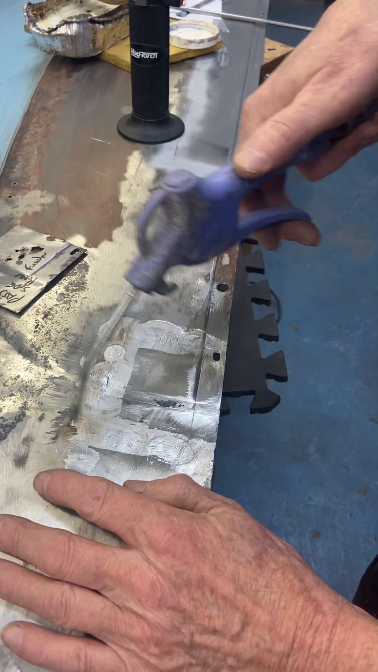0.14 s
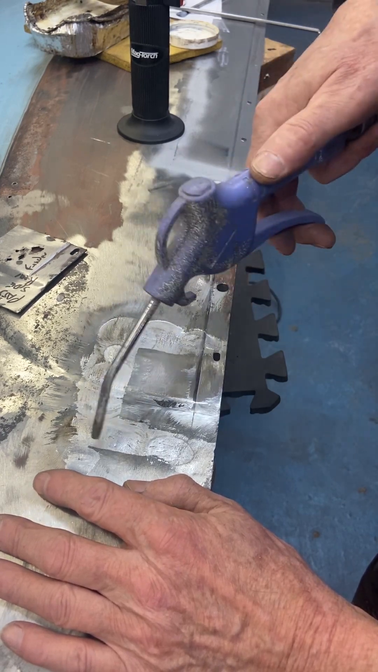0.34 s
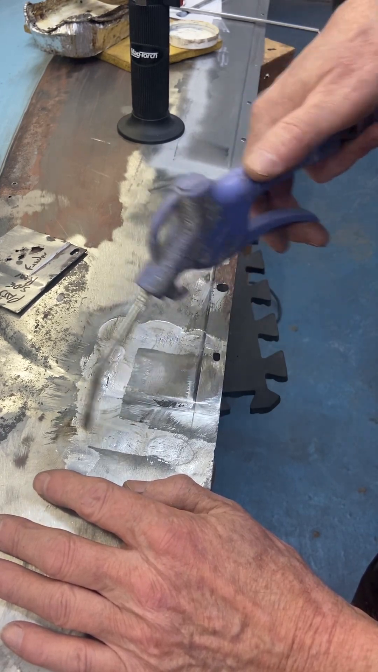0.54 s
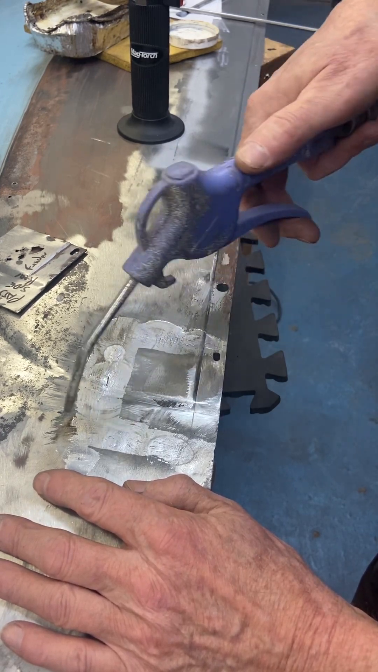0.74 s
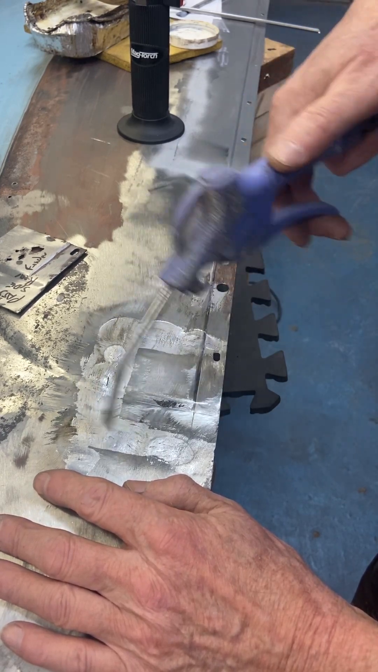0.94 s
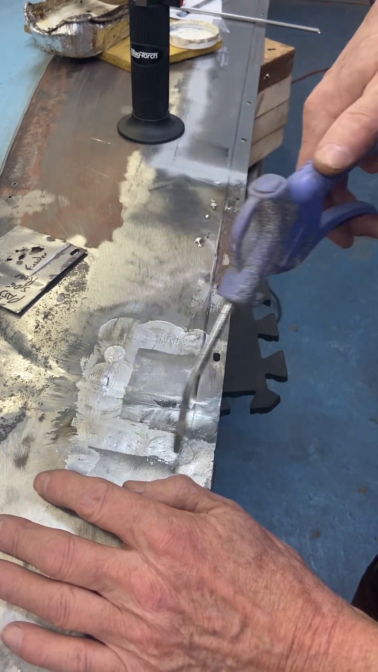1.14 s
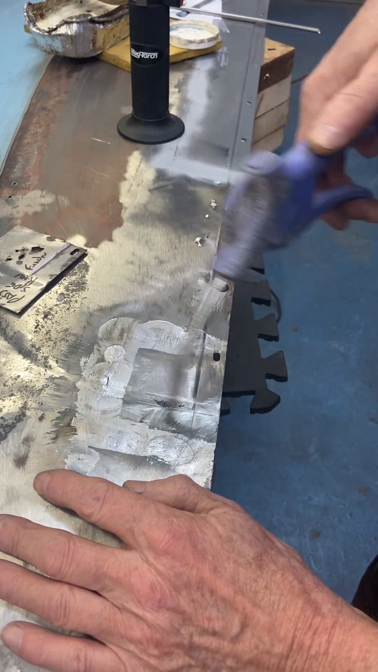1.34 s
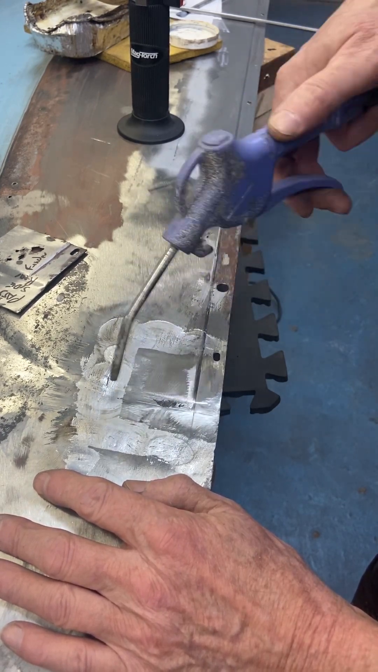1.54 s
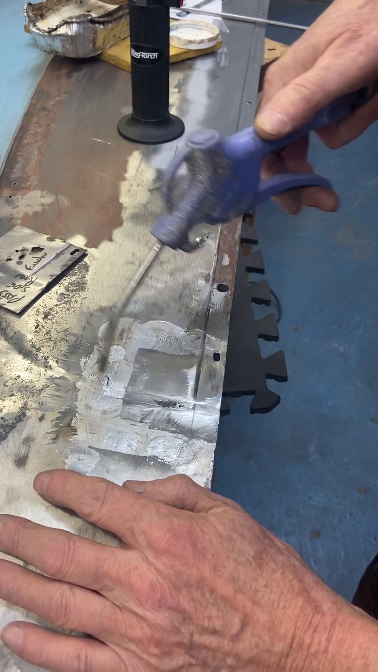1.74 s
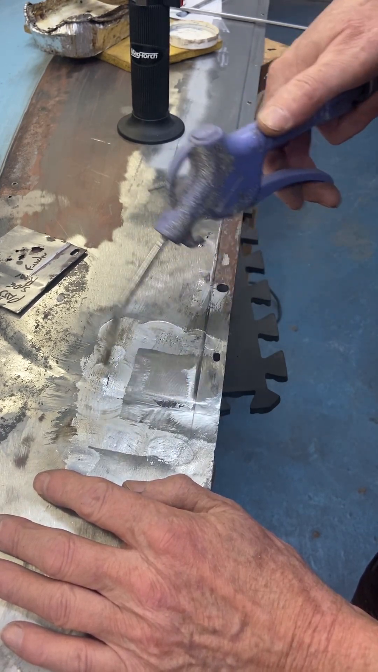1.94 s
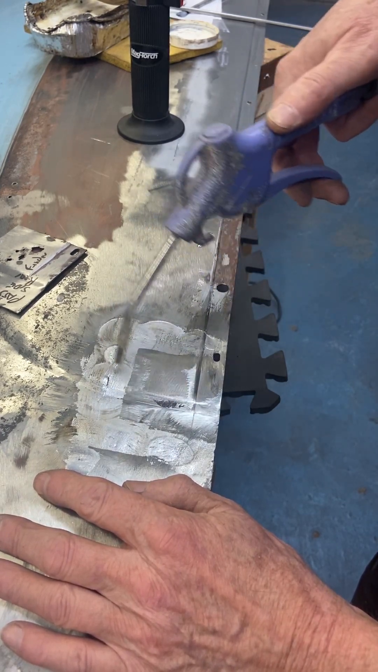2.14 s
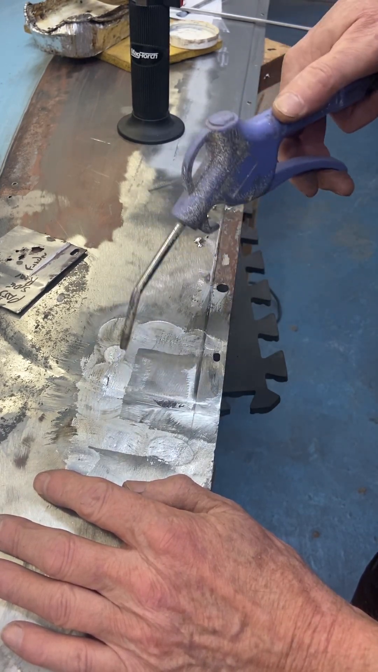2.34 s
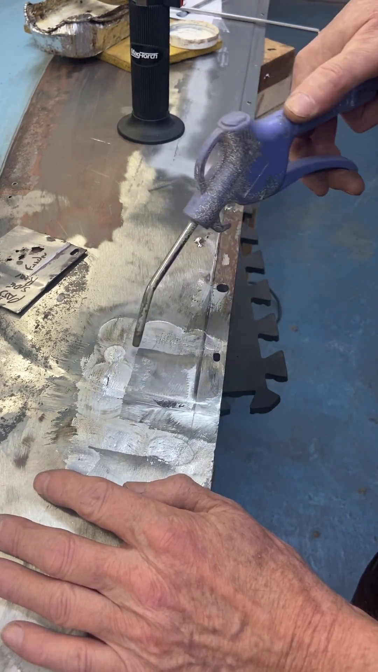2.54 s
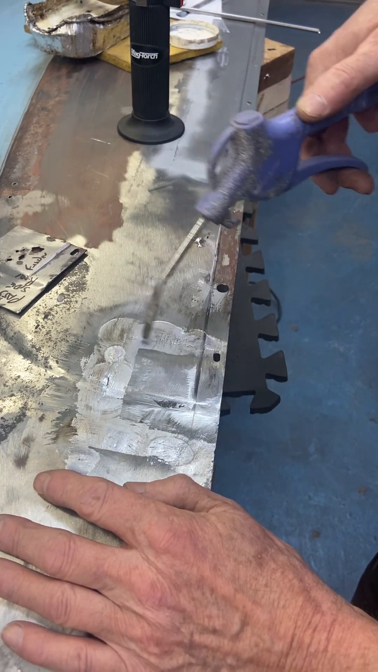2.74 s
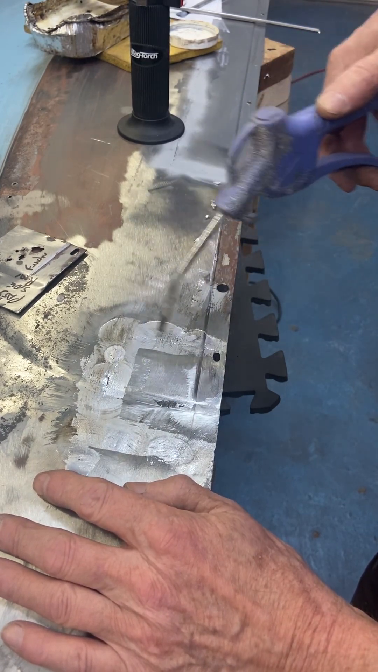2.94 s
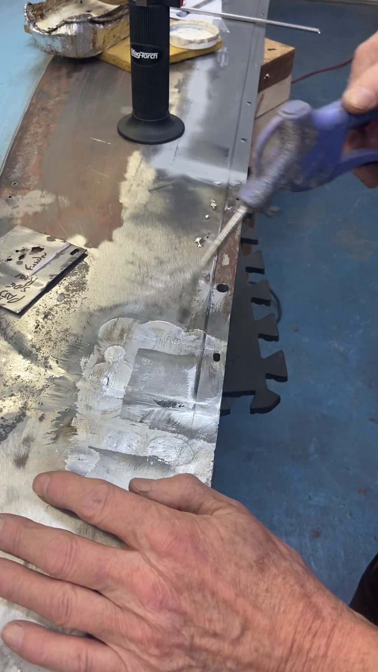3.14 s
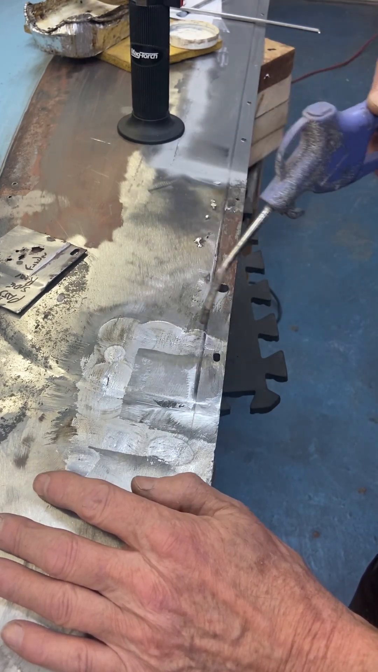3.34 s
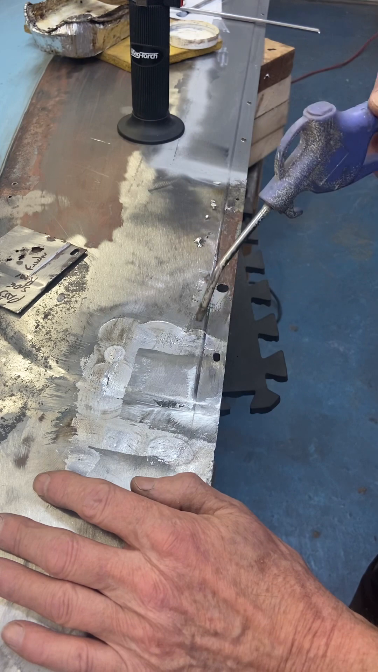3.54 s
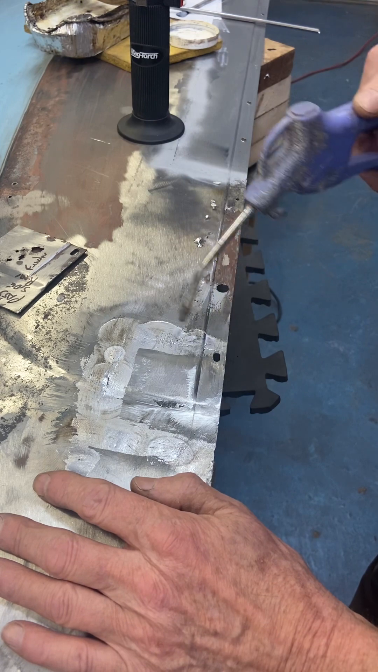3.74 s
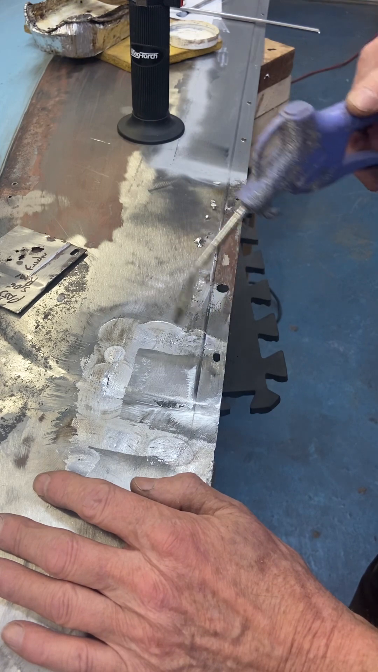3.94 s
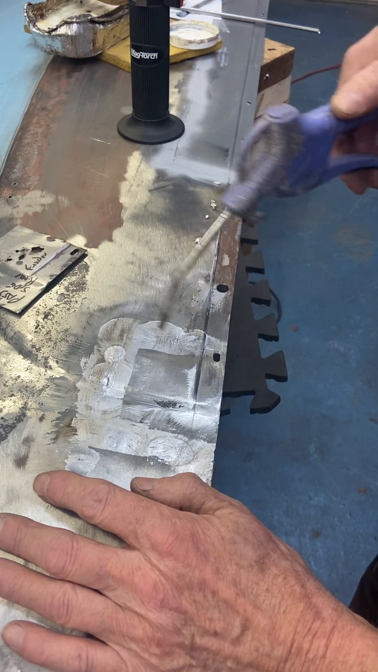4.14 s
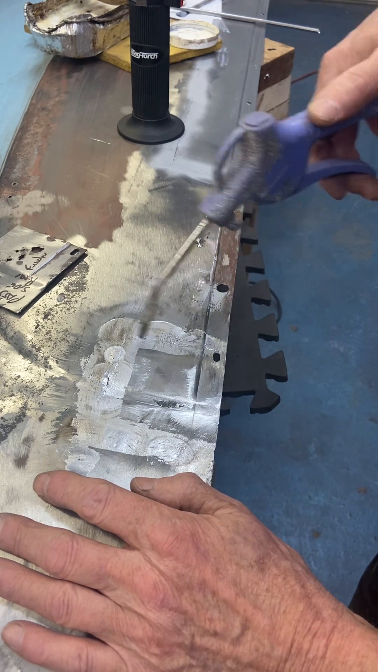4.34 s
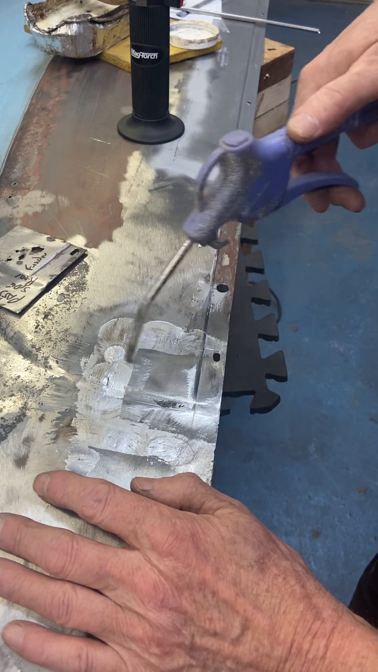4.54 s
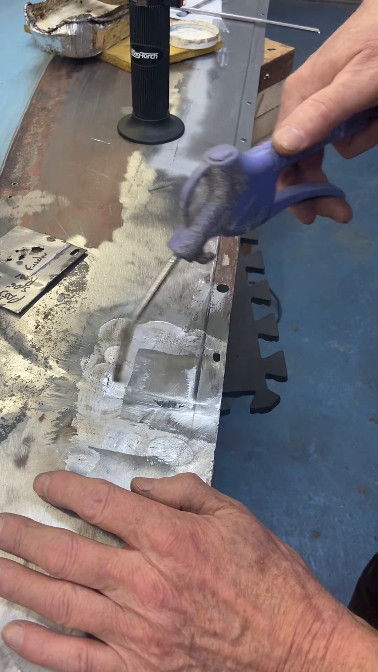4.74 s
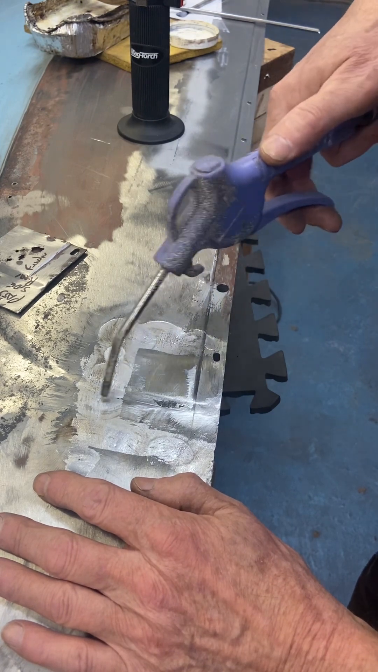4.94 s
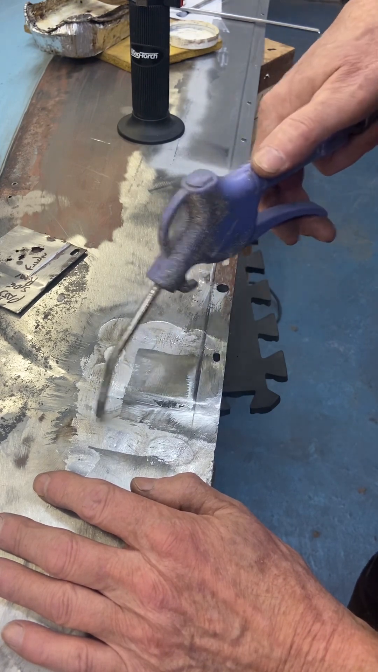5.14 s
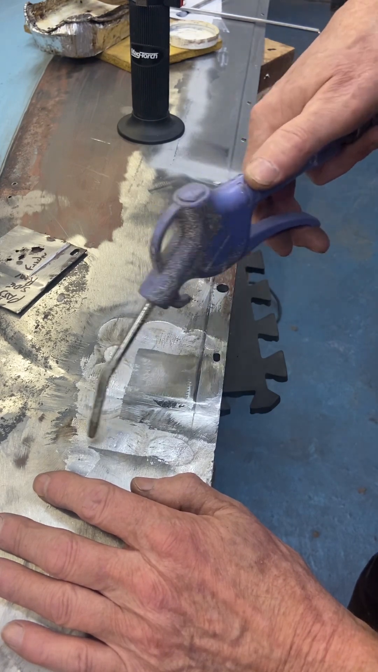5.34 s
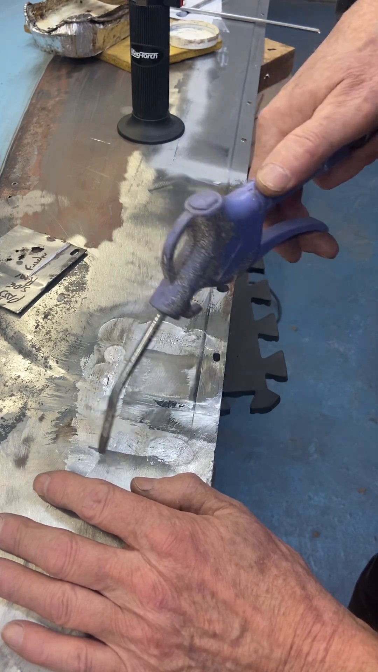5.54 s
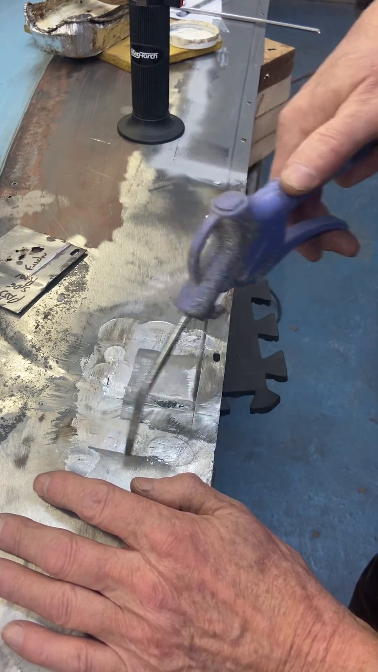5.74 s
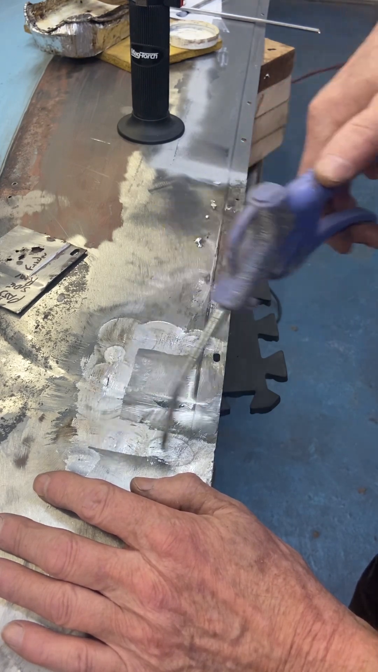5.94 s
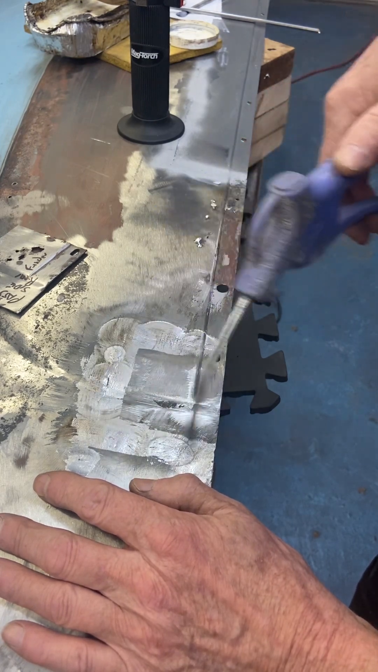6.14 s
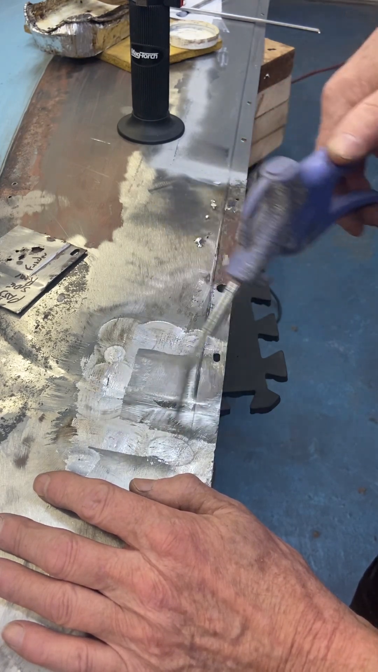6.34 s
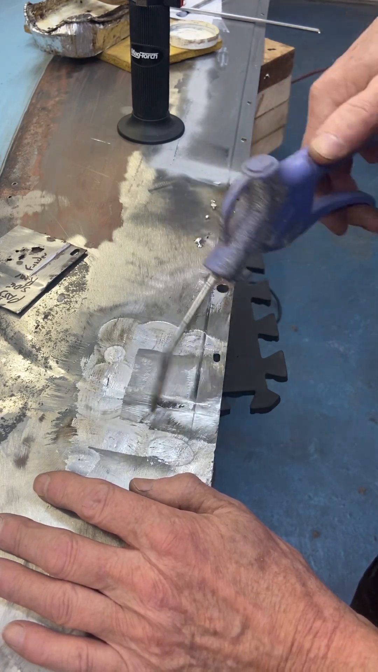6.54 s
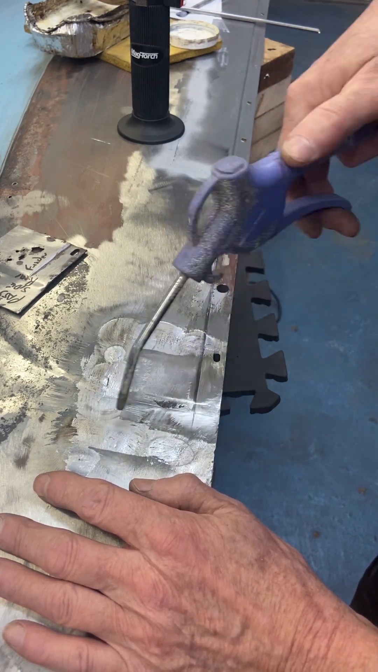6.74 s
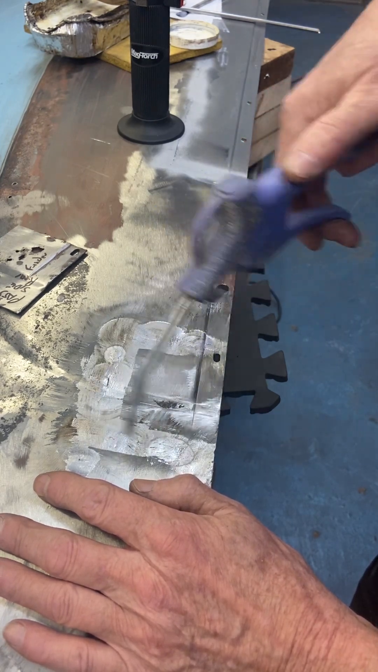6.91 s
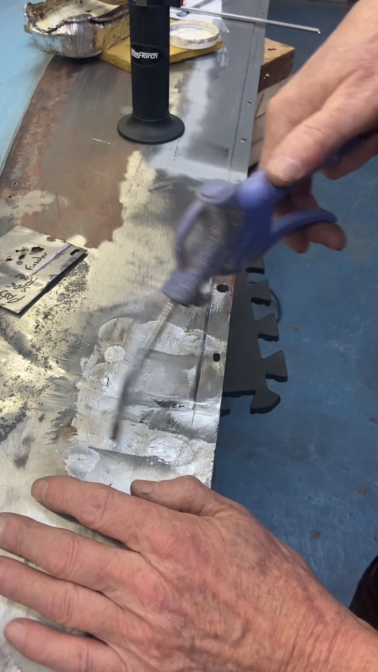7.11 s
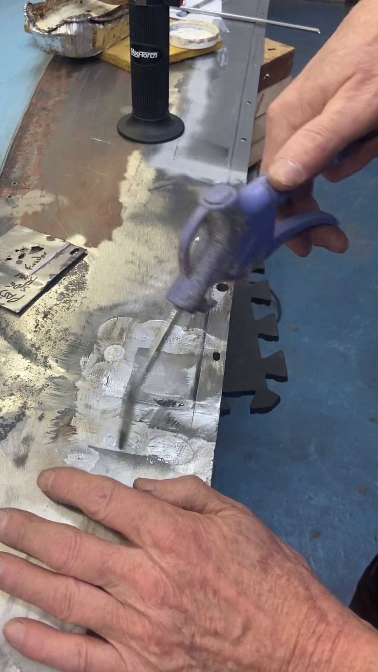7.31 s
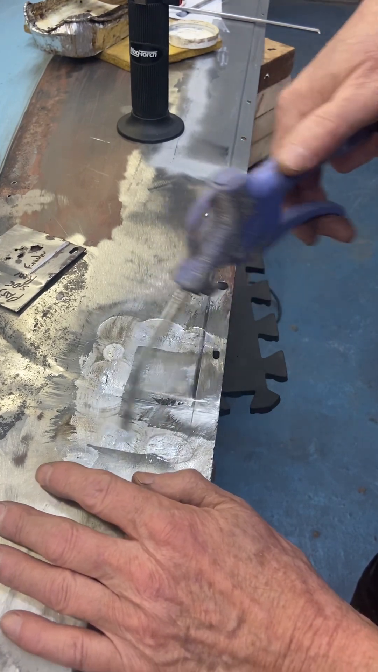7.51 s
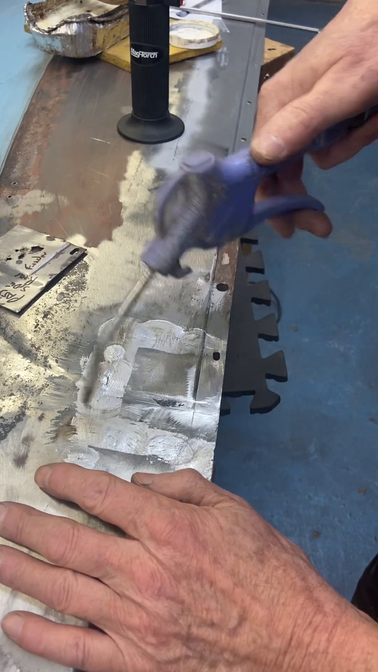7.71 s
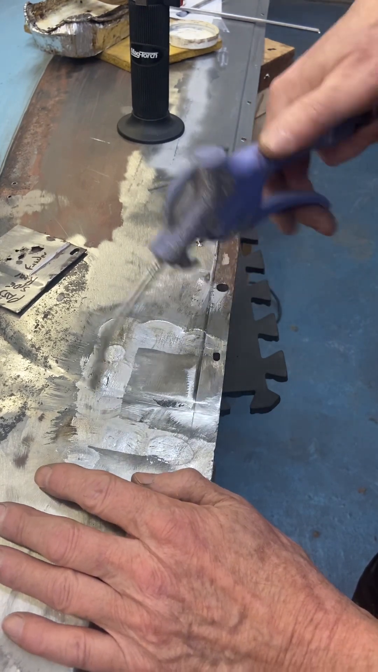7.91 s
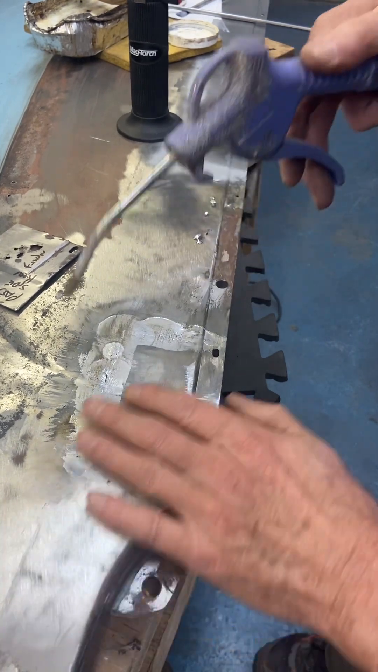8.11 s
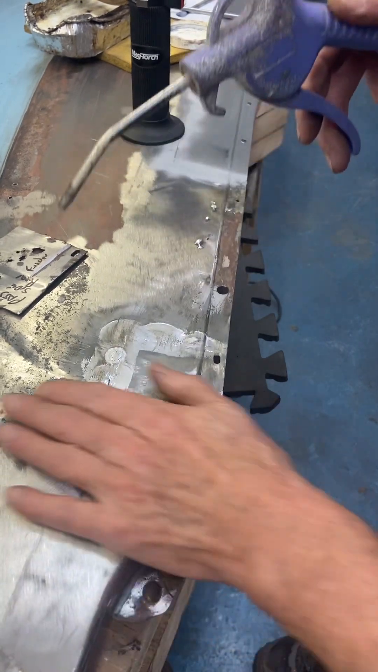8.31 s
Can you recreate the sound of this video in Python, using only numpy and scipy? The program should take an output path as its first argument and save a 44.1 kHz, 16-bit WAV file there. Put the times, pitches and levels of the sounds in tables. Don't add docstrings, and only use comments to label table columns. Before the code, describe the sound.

A compressed-air blow gun hisses brightly and steadily over a metal panel close up, gusts buffeting the microphone, then cuts off abruptly.

```python
import sys
import numpy as np
from scipy import signal
from scipy.fft import rfft, irfft, next_fast_len
from scipy.io import wavfile

SR = 44100
rng = np.random.default_rng(int(sys.argv[2]) if len(sys.argv) > 2 else 0)


def waveform_to_disk(signal):
    frames = np.transpose(np.atleast_2d(signal))
    scaled = np.clip(frames, -1, 1) * 32767
    samples = np.round(scaled).astype(np.int16)
    wavfile.write(sys.argv[1], SR, samples)


def ratio_of_db(decibels):
    return 10 ** (np.asarray(decibels, float) / 20)


N = 369116
TIME = np.arange(N) / SR
SIZE = next_fast_len(N + 4096)
HZ = np.maximum(np.arange(SIZE // 2 + 1) * SR / SIZE, 1)
SHUT_S = 7.99

# time in seconds, wash over the microphone in dB,
# splash off the panel in dB, churn that adds flutter in dB.
WIND = [(0.0, -58.5, -49.5, -2.5), (0.5, -62, -52.5, -0.5), (0.8, -50.5, -49, 0.5), (1.3, -35.5, -47, 2.5),
        (1.72, -40, -50, 2.5), (1.85, -61.5, -49, -0.5), (2.3, -53, -53, 1.5), (2.8, -62, -58, 1.5),
        (3.5, -59, -54.5, -5), (4.53, -79, -58.5, 1.5), (4.62, -72.5, -52, 6), (5.25, -68.5, -49.5, 1),
        (5.45, -60.5, -57.5, -0.5), (6.1, -70, -53, -1), (6.4, -92.5, -55, -4.5), (6.95, -99, -59.5, 2),
        (7.4, -82, -57.5, -2.5), (7.92, -77, -54.5, -4)]
# middle in seconds, half length in seconds, swell of the wash in dB, of the splash in dB.
GUSTS = [(0.09, 0.035, 13, 1.5), (0.22, 0.07, -24, 2), (0.34, 0.064, 13, 0), (0.46, 0.054, -15, 5),
         (0.58, 0.14, 11.5, 3), (0.74, 0.042, -8, 4.5), (0.85, 0.055, 13.5, 3.5), (0.93, 0.056, 7, 1.5),
         (1.09, 0.039, 6.5, -0.5), (1.27, 0.041, 8.5, 0.5), (1.92, 0.11, 16, -2.5),
         (3.02, 0.035, 12.5, 4.5), (3.17, 0.036, 10, 3), (3.43, 0.13, 13, 4), (3.63, 0.023, 11, 0.5),
         (3.85, 0.18, 3, 2), (4.07, 0.064, -4, 0.5), (4.81, 0.12, 1, 3), (4.98, 0.16, -5, 5.5),
         (5.54, 0.21, 9, 5.5), (5.72, 0.082, 6, 5.5), (5.94, 0.074, 11, 3.5), (6.25, 0.028, 5, 3.5),
         (6.46, 0.03, 2, 2), (6.6, 0.074, -2, 1.5), (7.06, 0.088, 5.5, -1), (7.22, 0.064, 2, 5),
         (7.44, 0.055, 4, 2.5), (7.55, 0.05, 6, 2.5), (7.69, 0.087, -1, 5.5)]


def rms_one(x):
    return x / np.sqrt(np.mean(x ** 2) + 1e-20)


def in_time(rows):
    s, *columns = np.transpose(rows)
    return [np.interp(TIME, s, c) for c in columns]


def swells(rows):
    out = np.zeros((2, N))
    for s, half_s, *db in rows:
        span = slice(max(round((s - half_s) * SR), 0), round((s + half_s) * SR))
        out[:, span] += np.outer(db, np.cos(np.pi / 2 * (TIME[span] - s) / half_s) ** 2)
    return out


def at_hz(points, hz):
    point_hz, value = np.transpose(points)
    return np.interp(np.log(hz), np.log(point_hz), value)


def drift(rate):
    r = np.exp(-80 * np.pi * rate / SR)
    white = rng.standard_normal(N // 40 + 2002)
    slow = signal.lfilter([1], [1, -2 * r, r * r], white)[2000:]
    return np.interp(np.arange(N) / 40, np.arange(len(slow)), rms_one(slow))


def shaped(x, response):
    return irfft(rfft(x, SIZE) * response, SIZE)[..., :N]


def above(edge_hz, width_oct):
    return np.sin(np.pi / 2 * np.clip(.5 + np.log2(HZ / edge_hz) / width_oct, 0, 1)) ** 2


def noise_pair():
    # frequency in Hz, likeness of the ports from 0 to 1.
    likeness = [(60, 0.99), (160, 0.995), (300, 0.97), (450, .8), (660, 0.5), (1070, 0.7), (1900, 0.85),
                (2700, .98), (4000, 0.995)]
    # frequency in Hz, left minus right in dB.
    balance_db = [(120, -0.4), (240, .5), (450, 4.5), (800, 3.5), (1300, 1.5), (2200, .5), (7000, 0)]
    # frequency in Hz, lead in radians.
    low_lead = [(60, .2), (160, 0.3), (380, 0.55), (700, 0.2), (1000, 0.05), (1700, 0.04), (3000, 0)]
    alike = np.clip(at_hz(likeness, HZ), 0, 1)
    mid, side = rfft(rng.standard_normal((2, SIZE)))
    sign = np.array([[1], [-1]])
    pair = np.sqrt(1 + alike) * mid + sign * np.sqrt(1 - alike) * side
    return pair * ratio_of_db(sign * at_hz(balance_db, HZ) / 2) * np.exp(.5j * sign * at_hz(low_lead, HZ))


def jet(patchy_db, eddy_db):
    # time in seconds, nearness as nozzle hiss in dB, aim in dB that lifts the very top,
    # strike on the panel as scour in dB, slant in dB that brightens it.
    hand = [(0.0, -30, -2, -41, 0.5), (0.7, -29.5, -2, -40, 0.5), (1.04, -25, -6, -39.5, 1),
            (1.4, -25, -2.5, -38.5, 4.0), (1.62, -27, -9, -42, 3), (1.96, -37, -1, -42, 4.5),
            (2.5, -33.5, -6.5, -44.5, 2.5), (3.0, -33, -7, -44.5, 2.5), (3.44, -33.5, -3.5, -42, 5.5),
            (4.1, -31, -5.5, -45.5, 2.5), (4.56, -33, -9, -46.5, 3.5), (5.1, -26, -16, -45.5, 9.5),
            (5.5, -32.5, 0, -39.5, -0.5), (5.84, -33, -1.5, -41, 3), (6.36, -28.5, -1.5, -42.5, 4.5),
            (6.8, -25.5, -7, -45, 1.5), (7.3, -32.5, -0.5, -42, -4), (7.92, -25, -9, -44.5, -1)]
    layer_hz = [800, 3500, 8000, 11800, 14800]
    # frequency in Hz, level in dB per Hz.
    colour = [(150, -74.5), (300, -24.5), (500, -18), (1000, -18.5), (2000, -13), (3200, -9.5),
              (4300, -10.5), (6000, -10), (7500, -7.5), (8400, -4), (9300, -2.5), (11100, 2.5), (12000, 3),
              (13100, 1), (14300, 1.5), (15700, -3.5)]
    # middle in seconds, half
    # length in seconds, change of the hiss in dB, change of the strike in dB.
    flicks = [(0.21, 0.07, -2, -2.5), (0.47, 0.1, -3.0, -3.5), (1.15, 0.13, -4, -1), (1.39, 0.077, -3, 1),
              (1.79, 0.072, -5, -2.5), (2.01, 0.11, -2.5, -3), (2.22, 0.14, -2.5, -2), (2.81, 0.37, 2, 2),
              (3.31, 0.052, -0.5, -1), (3.655, 0.032, -7, -9.5), (3.77, 0.057, -1, -3),
              (3.87, 0.085, -0.5, 1.5), (4.4, 0.1, 0, -0.5), (4.66, 0.12, -1.5, -3.5),
              (4.79, 0.074, -5, -4.5), (4.97, 0.25, -0.5, -1), (5.53, 0.063, -5, 1),
              (5.78, 0.082, -1.5, 0.5), (6.0, 0.087, -6, -1.5), (6.2, 0.063, -7, -2),
              (6.64, 0.064, -4.5, 0), (6.87, 0.055, -5.5, 1), (6.99, 0.1, -1, -1), (7.09, 0.04, -1, 1.5),
              (7.21, 0.051, -0.5, -3), (7.83, 0.081, -4, 2), (3.84, .11, -0.5, 0), (4.07, .05, -3.5, 0.5),
              (5.66, .04, 3, -0.5), (5.92, .04, 3.5, 0.5), (6.09, .06, 0, -0.5), (6.72, 0.087, 1.5, 0),
              (.74, 0.065, -0.5, -2.5),
              (0.07, 0.083, 0.5, 1),
        (6.336, 0.066, 3, -0.5),
        (7.65, .18, 3, 0),
    ]
    closing_s, closing_db = 0.13, 19.5
    closing_share = [-0.34, 0.42, 0.023, 0.96, 0.66]
    level_db, shut_db_per_s = -27, 1500

    near, aim, strike, slant = in_time(hand)
    turn, lift = swells(flicks)
    roar = in_time(WIND)[1] + 1.38 * swells(GUSTS)[1]
    scour = strike + lift
    shear = strike + slant + 0.5 * lift
    hiss = near + turn
    top = near + aim + 0.77 * turn
    layers = np.array([roar, scour, shear, hiss, top])
    layers = layers - np.mean(layers, axis=1, keepdims=True)
    easing = np.clip(1 + (TIME - SHUT_S) / closing_s, 0, 1) ** 2
    layers = layers - np.outer(closing_share, closing_db * easing)

    spectrum = noise_pair() * ratio_of_db(at_hz(colour, HZ))
    spectrum = spectrum / np.std(irfft(spectrum[0] * (HZ > 10500), SIZE))
    centres = np.geomspace(300, 15500, 17)
    out, sway = 0, drift(4.1)
    for k, hz in enumerate(centres):
        share = np.interp(np.log(HZ), np.log(centres), np.arange(len(centres)) == k)
        weights = [np.interp(np.log(hz), np.log(layer_hz), row) for row in np.eye(len(layer_hz))]
        flicker = patchy_db * (.5 * sway + drift(4.6)) + eddy_db * drift(23.4)
        sides = 1 + (hz < 4000)
        band = irfft(spectrum[:sides] * share, SIZE)[:, :N]
        out = out + ratio_of_db(weights @ layers + flicker) * band
    return out * ratio_of_db(level_db - shut_db_per_s * np.maximum(TIME - SHUT_S, 0))


def sliding_notches(pair):
    # start in seconds, end in seconds, first Hz, last Hz, depth from 0 to 1.
    slots = [
        (3.33, 3.66, 4330, 4560, .9),
        (3.62, 4.72, 4520, 4640, 1),
        (4.85, 6.0, 4560, 4480, .45),
        (3.85, 4.8, 5700, 5900, .6),
        (5.55, 6.25, 5750, 5740, .55),
        (6.24, 6.46, 2100, 2280, .85),
        (6.44, 6.7, 2150, 2850, .8),
        (6.48, 6.64, 1560, 1480, .6),
        (6.75, 7.25, 2780, 2550, .55),
    ]
    width_hz, fade_s = 460, .05
    out, r = pair.copy(), np.exp(-np.pi * width_hz / SR)
    shake_hz, shake = 60 * drift(5), .3 * drift(16.0)
    for start, end, from_hz, to_hz, depth in slots:
        state = np.zeros((2, 2))
        for i in range(round(start * SR), round(end * SR), 512):
            block = slice(i, i + 512)
            s = TIME[block]
            w = 2 * np.pi * (np.interp(s[0], [start, end], [from_hz, to_hz]) + shake_hz[i]) / SR
            poles = [1, -2 * r * np.cos(w), r * r]
            zeros = [(1 - r * r) / 2, 0, (r * r - 1) / 2]
            band, state = signal.lfilter(zeros, poles, pair[:, block], zi=state)
            fade = np.clip(np.minimum(s - start, end - s) / fade_s, 0, 1)
            out[:, block] -= np.clip(depth + shake[block], 0, 1) * fade * band
    return out


def shade(pair, rows, fade_s, order):
    out = pair.copy()
    for start, end, hz, half_hz, db in rows:
        span = slice(max(round((start - .1) * SR), 0), round((end + .1) * SR))
        fade = np.clip(np.minimum(TIME[span] - start, end - TIME[span]) / fade_s + .5, 0, 1)
        size = next_fast_len(len(fade) + 1024)
        bell = np.exp(-((np.arange(size // 2 + 1) * SR / size - hz) / half_hz) ** order)
        band = irfft(rfft(pair[:, span], size) * bell, size)[:, :len(fade)]
        out[:, span] += (ratio_of_db(db * fade) - 1) * band
    return out


def ports(pair):
    # time in seconds, share from 0 to 1, stretch of the pattern in pitch.
    off_axis = [(0, .06, .93), (1.62, .01, .93), (1.8, .42, .93), (2.38, .66, .96), (2.43, .97, .97),
                (2.5, .95, .96), (2.54, .72, .97), (2.6, .97, .985), (2.7, .97, 1), (2.75, .7, 1),
                (2.8, .9, 1.03), (2.88, .9, 1.045), (2.92, .72, 1.04), (3.06, .68, 1.04), (3.11, .96, 1.05),
                (3.16, .64, 1.05), (4.0, .68, 1.07), (4.75, .62, 1.05), (4.9, .4, 1), (5.2, .25, .95),
                (5.35, 0, .95)]
    # frequency in Hz, lead in radians.
    off_axis_lead = [(1700, 0), (3200, 1.6), (4050, .6), (4600, 1.9), (5150, 2.45), (5480, 3.12), (5620, 3),
                     (6000, 2.2), (6500, 1.4), (7300, 0)]
    # frequency in Hz, lag in half turns.
    port_lag = [(6900, 0), (7500, .07), (8420, .93), (9560, 1.04), (10450, 1.94), (11650, 2.06),
                (12720, 2.93), (13700, 3.04), (14850, 3.94), (15700, 4)]
    # start in seconds, end in seconds, turn near Hz, slide in Hz.
    slides = [(1.3, 1.9, 12200, -300), (4.45, 4.72, 12200, -130), (4.72, 5.1, 12200, -380),
              (5.1, 5.42, 12200, -120), (5.2, 5.45, 10000, 380), (4.55, 5.2, 10000, 60),
              (4.1, 4.55, 10000, -120), (2.8, 2.9, 10000, -300), (5.7, 7.99, 8000, 120),
              (2.35, 3.15, 14300, -250), (0, 1.5, 14300, 150), (6.2, 7.9, 14300, 150)]
    off_axis_db = 2.5
    shake_hz, reach_hz = 60, 800

    hz, s, frames = signal.stft(pair[0], SR, nperseg=512, noverlap=384)
    sway = .02 * drift(2) + .036 * drift(12)
    share, stretch, path = (np.interp(s, TIME, c) for c in (*in_time(off_axis), sway))
    hz = hz[:, None]
    lead = np.interp(hz / stretch, *np.transpose(off_axis_lead), left=0, right=0)
    slide = 0
    for turn_hz in (8000, 10000, 12200, 14300):
        shake = np.interp(s, TIME, shake_hz * drift(9))
        slide = slide + np.exp(-((hz - turn_hz) / reach_hz) ** 2) * shake
    for start, end, turn_hz, by_hz in slides:
        fade = np.clip(np.minimum(s - start, end - s) / .04 + .5, 0, 1)
        slide = slide + by_hz * np.exp(-((hz - turn_hz) / reach_hz) ** 2) * fade
    lag = np.pi * np.interp(hz - slide, *np.transpose(port_lag))
    turned = np.exp(1j * (lead * share - lag + 2 * np.pi * hz * path / SR))
    turned = turned * ratio_of_db(off_axis_db * share * np.abs(np.sin(lead)))
    left = signal.istft(frames * turned, SR, nperseg=512, noverlap=384)[1][:N]
    return np.array([left, pair[1]])


def wind(lump_db, flutter_lump_db):
    # frequency in Hz, level in dB per Hz.
    thud_colour = [(14, -46), (30, -18), (50, -3.5), (80, -0.5), (120, -1), (170, -3), (260, -30)]
    flutter_colour = [(60, -76), (125, -27), (190, -0.5), (230, 1), (330, -2), (480, -6.5), (900, -16),
                      (2000, -46)]
    # middle in seconds, swell in dB.
    buffets = [(.78, -1), (1.03, -4), (1.09, 3), (1.17, 3.5), (1.2, 5.5), (1.26, 2), (1.385, 5.5),
               (1.47, 1.5), (1.52, 1), (1.56, 4), (1.62, 7), (1.66, 4.5), (1.735, 5.5), (2.24, 8),
               (2.39, 0)]
    buffet_half_s = 0.036
    gusts = swells(GUSTS + [(s, buffet_half_s, db, 0) for s, db in buffets])
    wash, splash = in_time(WIND)[:2] + gusts
    flutter_db = 1.5 + in_time(WIND)[2] + 0.33 * wash + 0.68 * splash + 0.13 * gusts[0]
    lumps = drift(16) + drift(28.4)
    stop = ratio_of_db(-500 * np.maximum(TIME - SHUT_S - 0.005, 0))
    thud = irfft(noise_pair() * ratio_of_db(at_hz(thud_colour, HZ)), SIZE)[:, :N]
    thud = rms_one(thud * ratio_of_db(lump_db * lumps))
    flutter = irfft(noise_pair() * ratio_of_db(at_hz(flutter_colour, HZ)), SIZE)[:, :N]
    flutter = rms_one(flutter * ratio_of_db(flutter_lump_db * lumps))
    return stop * (ratio_of_db(wash + 0.3) * thud + ratio_of_db(flutter_db) * flutter)


def puffs(rise_s, fall_s, width_oct):
    # start in seconds, peak in dB, centre in Hz.
    crossings = [(0.076, -36.5, 410), (0.218, -38, 580), (0.325, -32.5, 1800), (0.457, -27.5, 935),
                 (0.561, -30.5, 422), (0.631, -39.5, 1950), (0.748, -27.5, 730), (0.822, -26, 300),
                 (0.575, -32, 260), (0.93, -45, 410), (1.044, -31, 458), (1.107, -37, 522),
                 (1.18, -32, 514), (1.247, -19, 300), (1.311, -25.5, 450), (1.38, -48, 415),
                 (1.435, -32, 463), (1.539, -27, 452), (1.602, -34, 557), (4.778, -34.5, 694),
                 (5.624, -46, 1920), (5.726, -40, 1250), (5.883, -39, 1890), (5.937, -43, 1490),
                 (6.146, -40, 450), (6.455, -45, 400), (7.205, -41, 800), (7.92, -38, 800),
                 (7.96, -37, 1100)]
    out, t = np.zeros((2, N)), np.arange(4096) / SR
    hz = np.maximum(np.arange(2049) * SR / 4096, 1)
    shape = (1 - np.exp(-t / rise_s)) * np.exp(-t / fall_s)
    for s, db, centre_hz in crossings:
        mid, side = rng.standard_normal((2, 4096))
        tone = np.exp(-(np.log2(hz / centre_hz) / width_oct) ** 2)
        burst = rms_one(irfft(rfft(mid + [[.5], [-.5]] * side) * tone)) * shape
        i = round(s * SR)
        out[:, i:i + 4096] += ratio_of_db(db - 8.0) * burst[:, :N - i] * ratio_of_db([[1.5], [-1.5]])
    return out


def slaps(gain_db, soft_hz):
    # start in seconds, peak in dB, fall in ms, push 1 or pull -1.
    fronts = [(.078, -19, .15, -1), (.578, -30, .9, -1), (.8265, -26, 1.2, -1), (1.2635, -30, .3, -1),
              (1.273, -21, .2, 1), (1.32, -22, .2, 1), (1.4365, -23, .25, -1), (1.4405, -29, .25, 1),
              (1.4645, -28, .15, -1), (1.4995, -29, .25, -1), (1.529, -30, .3, -1), (1.5412, -20, .2, 1),
              (6.456, -46, .25, -1)]
    steps, t = np.zeros(N), np.arange(1024) / SR
    for s, db, fall_ms, way in fronts:
        age = 1000 * t / fall_ms
        steps[round(s * SR):][:1024] += way * ratio_of_db(db + gain_db) * (1 - age) * np.exp(-age)
    soft = signal.butter(1, soft_hz, fs=SR, output="sos")
    return signal.sosfilt(soft, steps) * ratio_of_db([[1.2], [-1.2]])


def shop(x):
    # frequency in Hz, level in dB.
    colour = [(200, 1), (1000, 0.5), (2500, -4), (5500, 4), (8000, -6.5), (12000, -14.5), (15700, -16.5)]
    t60_s, wall_cut_hz = 0.63, 5300
    size = next_fast_len(N + SR)
    hz = np.arange(size // 2 + 1) * SR / size
    dull = 1 / np.sqrt(1 + (hz / wall_cut_hz) ** 2)
    response = np.zeros((2, len(hz)), complex)
    for k, lag in enumerate(rng.uniform(.02, .055, 16)):
        loop = ratio_of_db(-60 * lag / t60_s) * dull ** (lag * 8.0) * np.exp(-2j * np.pi * hz * lag)
        response[k % 2] += loop / (1 - loop) * (-1) ** (k // 2)
    return irfft(rfft(x, size) * response * ratio_of_db(at_hz(colour, hz + 1)), size)[:, :N]


def quiet_floor():
    # frequency in Hz, level in dB per Hz.
    colour = [(40, -50), (70, -22), (250, 0.5), (460, -1.5), (900, -5), (3000, -8), (8000, -10),
              (12000, -10), (15700, -13.5)]
    # time in seconds, gain in dB.
    gain = [
        (0, -4),
        (8.17, 2.5),
        (8.25, -0.5),
        (8.37, 1.5),
    ]
    hush = rms_one(shaped(rng.standard_normal((2, N)), ratio_of_db(at_hz(colour, HZ))))
    return hush * ratio_of_db(-76.5 + 3.0 + in_time(gain)[0])


def far(pair, alike_hz):
    left, right = rfft(pair, SIZE)
    top = above(alike_hz, 0.34)
    return np.array([irfft(left * (1 - top) + right * top, SIZE)[:N], pair[1]])


def scene():
    # start in seconds, end in seconds, centre in Hz, half width in Hz,
    # change in dB. Parts of the jet's noise lift or dim for a while.
    shading = [(-0.17, 0.805, 9900, 1400, -7), (2, 8.7, 2980, 160, -2), (1.5, 3.1, 8500, 400, -7),
               (4, 6.9, 8060, 810, -4), (4, 5.7, 9880, 590, -9), (6, 7.1, 8600, 420, 4.5),
               (4.5, 8.1, 8200, 450, 4), (6.5, 8.1, 3060, 250, 3), (6.47, 6.65, 270, 170, -11),
               (7.03, 7.18, 330, 170, -8), (3.66, 4.0, 740, 220, -3), (3, 4.59, 660, 440, -3.5),
               (4.62, 4.76, 890, 300, -4), (5.07, 5.17, 950, 280, -6.5), (0.2, 0.51, 1000, 310, 6),
               (5, 5.8, 8100, 560, -4.5), (-0.4, .09, 920, 400, 4.5), (0, .26, 900, 400, 3),
               (5, 5.33, 11500, 770, 2), (-0.3, 0.18, 1060, 450, -2.5), (-1.5, .4, 1000, 400, -4.5),
               (6.4, 6.4, 190, 70, -8), (1.75, 2.5, 5700, 470, -3.5), (5, 4.86, 5600, 850, -2),
               (7, 6.98, 450, 160, -3.5), (7.05, 7.15, 720, 120, -8), (2.5, 3.2, 4250, 550, -3.5),
               (4.85, 5.2, 5500, 810, -2.5), (1.15, 1.4, 280, 80, 3), (4, 4.4, 1730, 470, 3),
               (3.5, 3.3, 580, 250, -3)]
    drops = [(1.77, 1.79, 14200, 400, -14), (1.99, 2.03, 14800, 350, -22), (2.17, 2.22, 15200, 350, -14),
             (2.38, 2.39, 14100, 400, -16), (2.52, 2.59, 14750, 300, -24), (2.59, 2.61, 14100, 350, -18),
             (2.71, 2.73, 14200, 350, -16), (2.75, 2.83, 14950, 320, -24), (2.85, 2.87, 14100, 350, -16),
             (2.91, 2.96, 14000, 250, -12), (4.39, 4.45, 14500, 650, -20), (4.82, 4.87, 14100, 400, -16),
             (4.96, 5.02, 15000, 350, -24), (5.13, 5.17, 14600, 350, -12), (5.37, 5.4, 15200, 400, -12),
             (6.49, 6.57, 250, 110, -9),
        (6.6, 6.72, 190, 50, -8),
        (6.62, 6.76, 390, 50, -6),
        (6.86, 7.0, 220, 110, -6),
        (7.06, 7.14, 260, 150, -6),
        (8.07, 8.22, 14600, 900, -9),
        (8.16, 8.22, 11500, 1500, -5),
        (8.3, 8.33, 14600, 900, -6),
    ]
    # time in seconds, gain in dB.
    ring_return = [
        (0, -3),
        (7.98, -3),
        (8.02, -4),
        (8.1, -2.5),
        (8.37, 0.5),
    ]
    air = sliding_notches(shade(jet(patchy_db=0.99, eddy_db=0.65), shading, fade_s=.07, order=2))
    ring = ratio_of_db(-16 + in_time(ring_return)[0]) * shop(air[1])
    distant = far(ring + quiet_floor(), alike_hz=7340)
    puffed = puffs(rise_s=0.0019, fall_s=0.017, width_oct=0.46) + slaps(gain_db=5.0, soft_hz=4500)
    heard = ports(air + distant) + puffed + wind(lump_db=1.1, flutter_lump_db=1.33)
    return shade(heard, drops, fade_s=.02, order=4)


def low_cut(pair):
    calm_hz, calm_db, calm_db_per_oct = 95, -80, 10
    wash = in_time(WIND)[0] + swells(GUSTS)[0]
    edges = 12 * 2 ** np.arange(6)
    place = np.log2(calm_hz / edges[0]) + (calm_db - wash) / calm_db_per_oct
    place = np.clip(place, 0, len(edges) - 1)
    spectrum = rfft(pair, SIZE)
    out = 0
    for k, hz in enumerate(edges):
        copy = irfft(spectrum / np.sqrt(1 + (hz / HZ) ** 8), SIZE)[:, :N]
        out = out + np.maximum(1 - np.abs(place - k), 0) * copy
    return out


def low_pass(x):
    return signal.sosfilt(signal.butter(12, 17080, fs=SR, output="sos"), x)


def record(dry):
    mix = shaped(low_cut(dry), 1 - above(15740, .006))
    return low_pass(mix)


dry = scene()
out = record(dry)
waveform_to_disk(out)
```